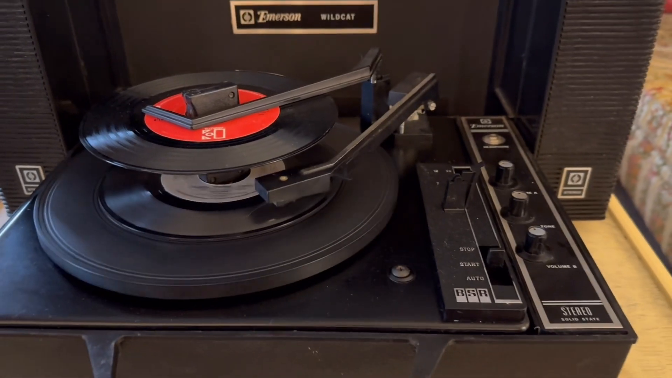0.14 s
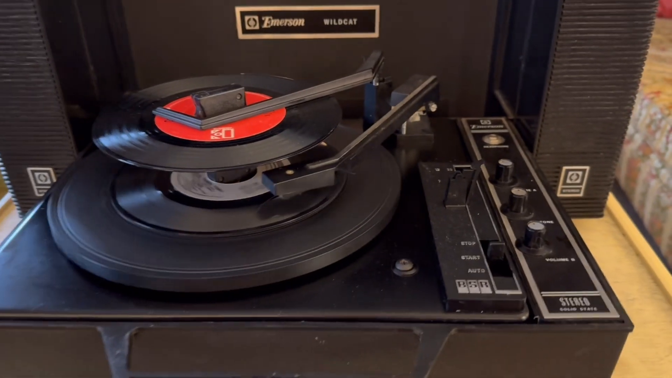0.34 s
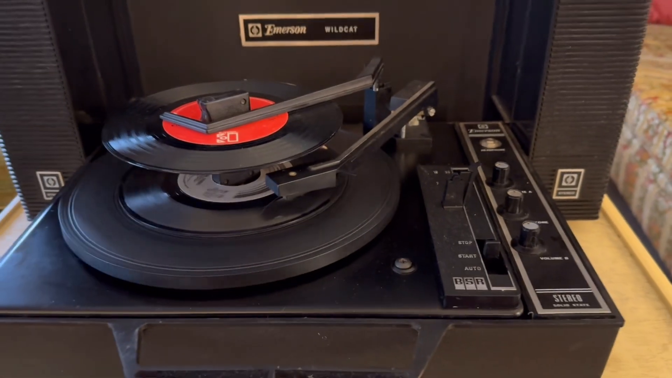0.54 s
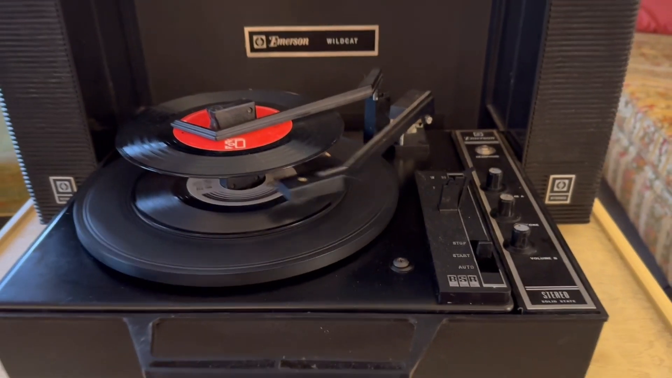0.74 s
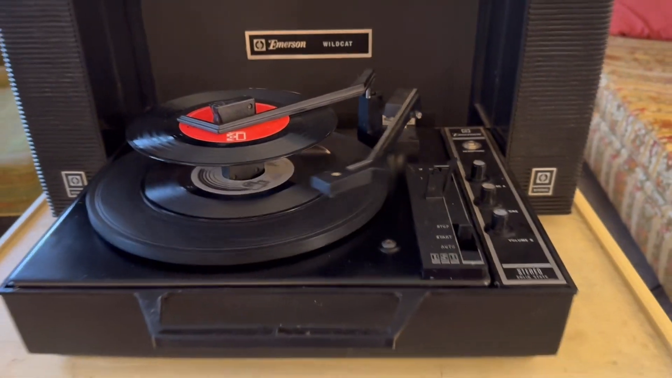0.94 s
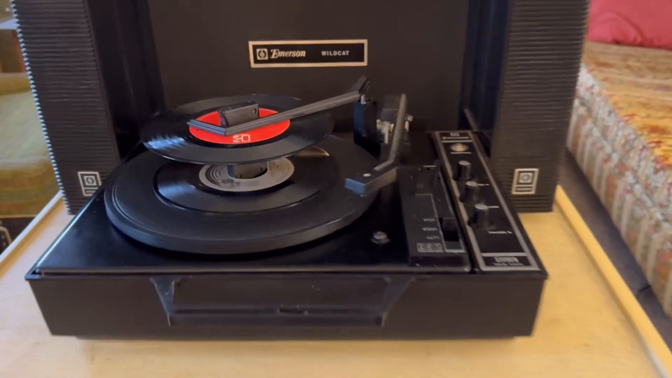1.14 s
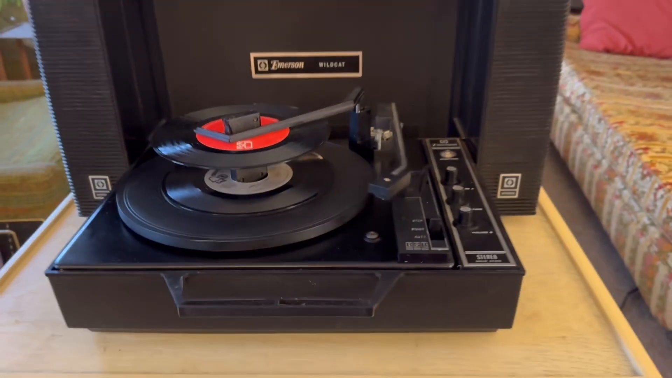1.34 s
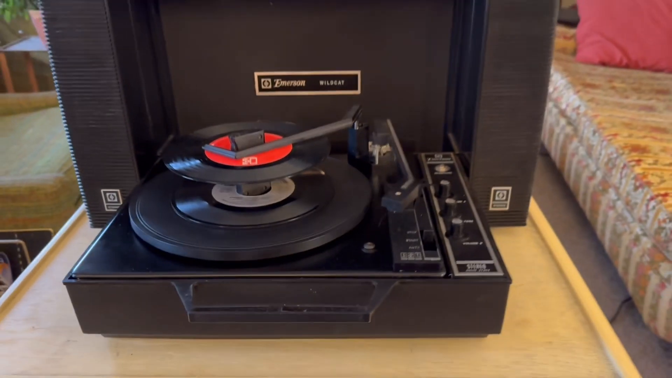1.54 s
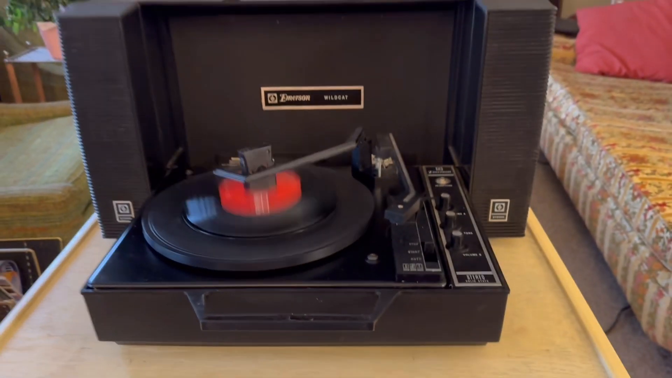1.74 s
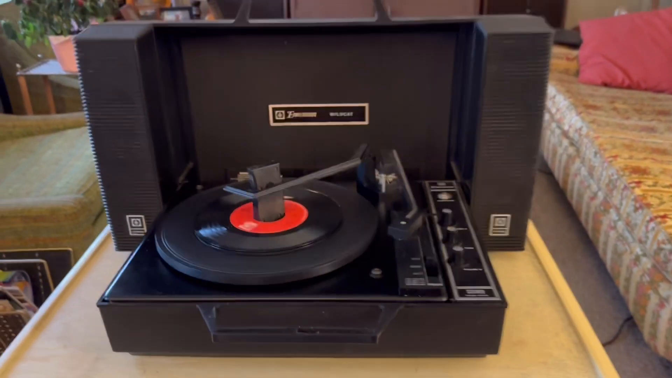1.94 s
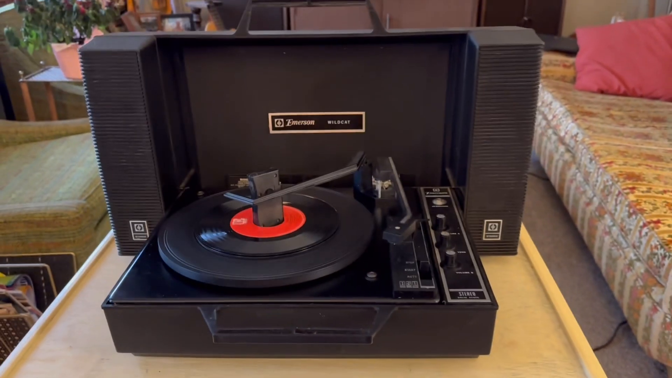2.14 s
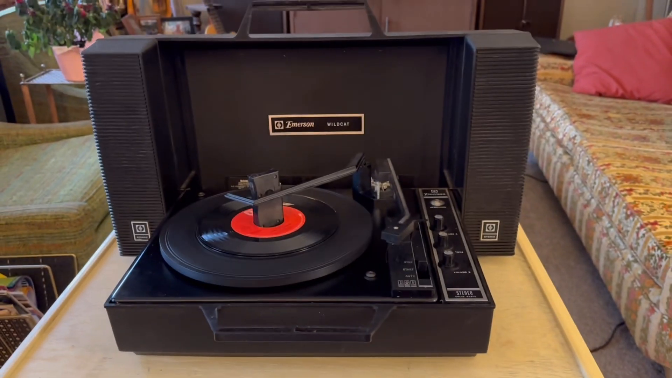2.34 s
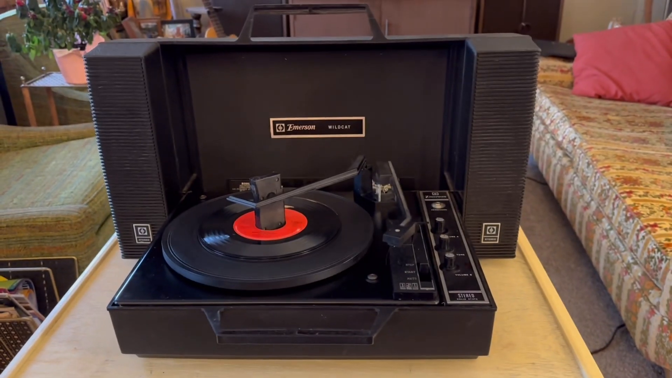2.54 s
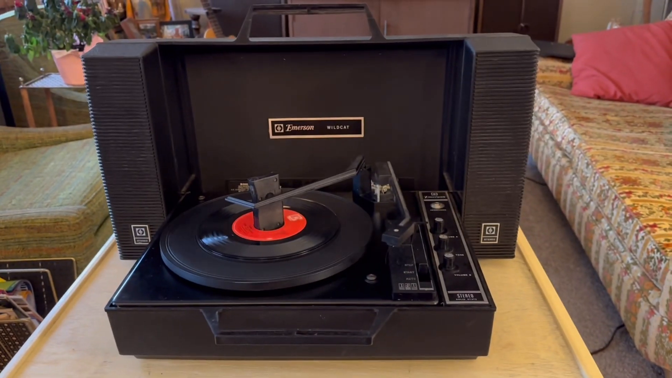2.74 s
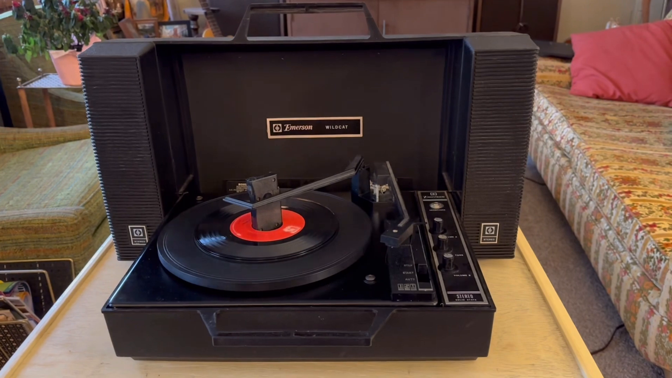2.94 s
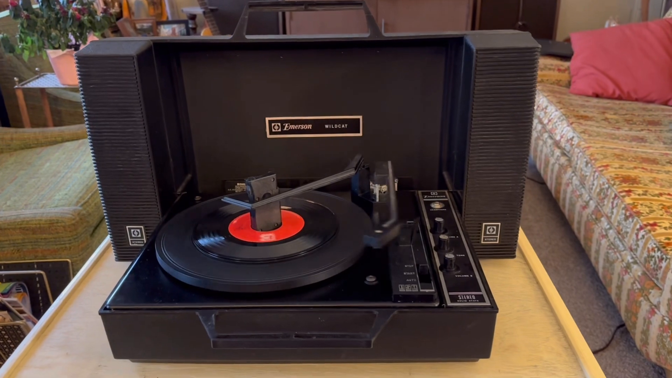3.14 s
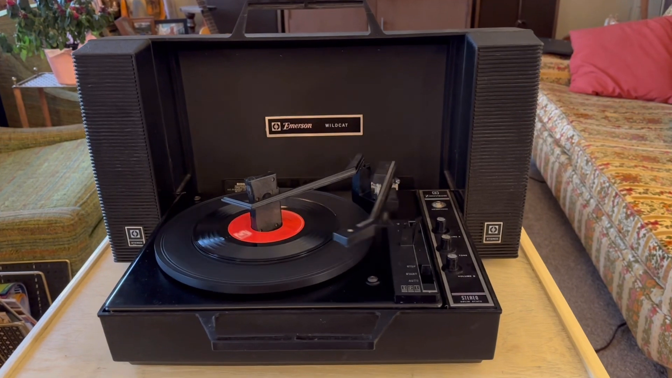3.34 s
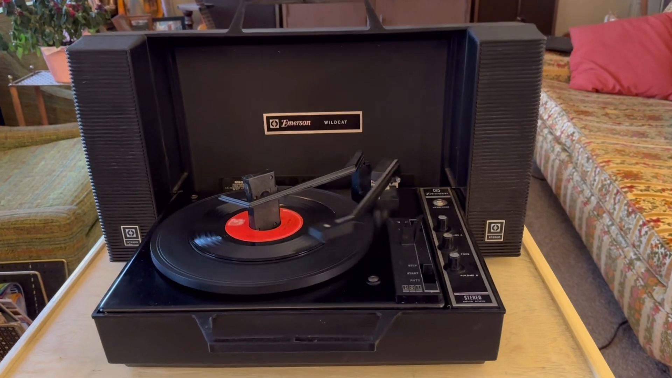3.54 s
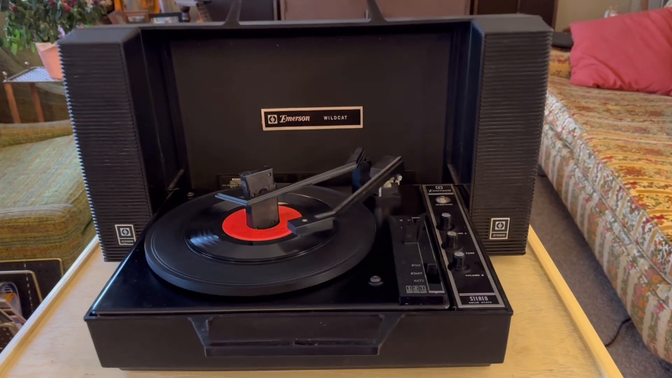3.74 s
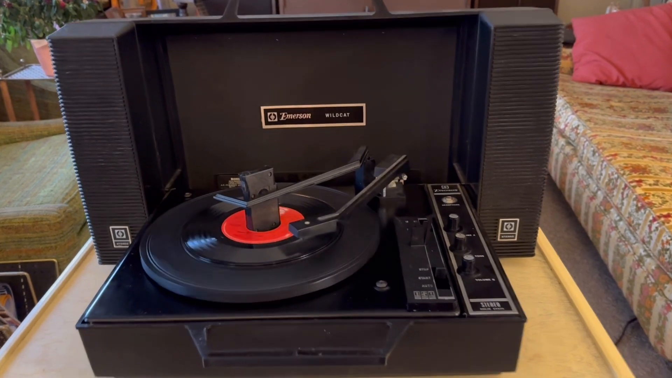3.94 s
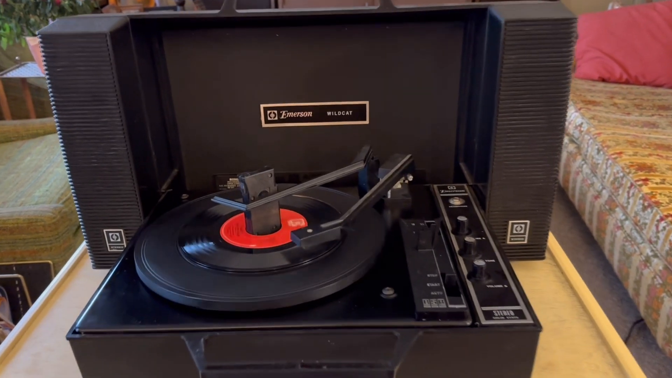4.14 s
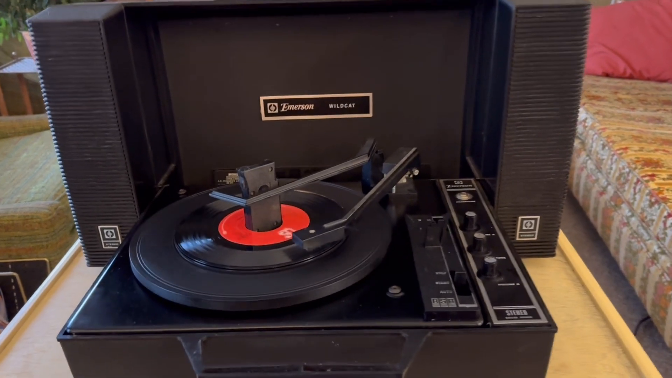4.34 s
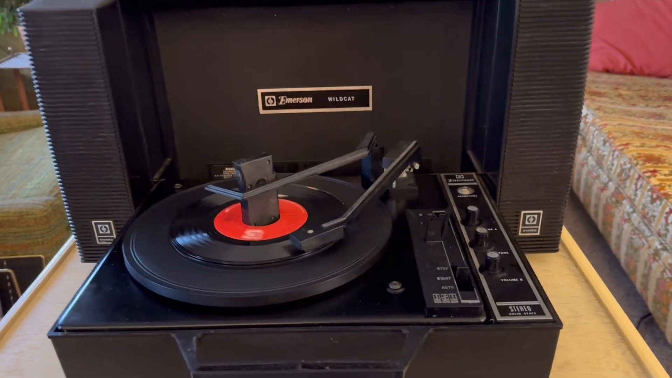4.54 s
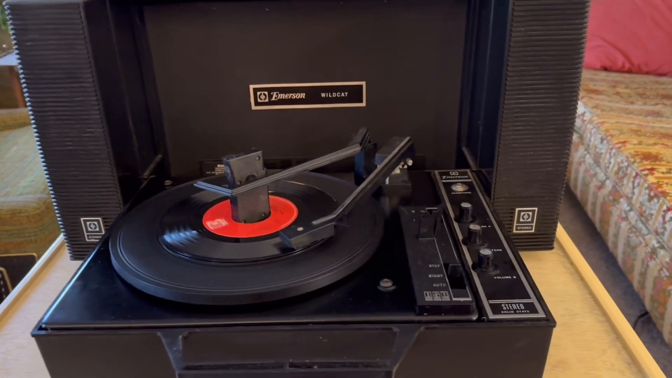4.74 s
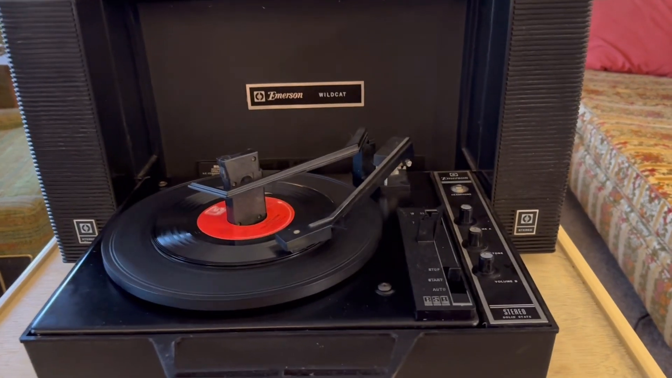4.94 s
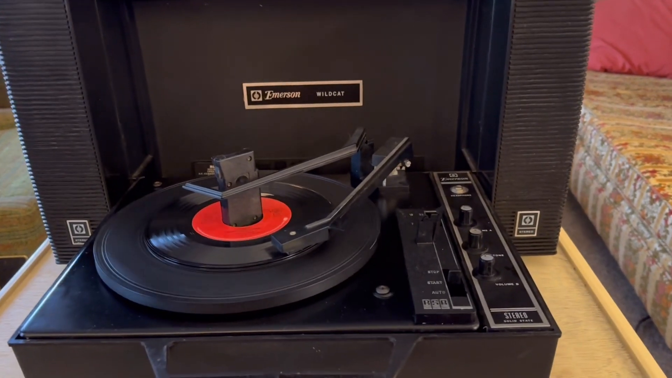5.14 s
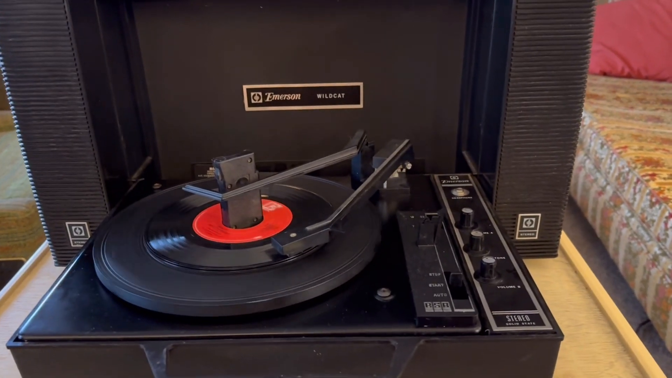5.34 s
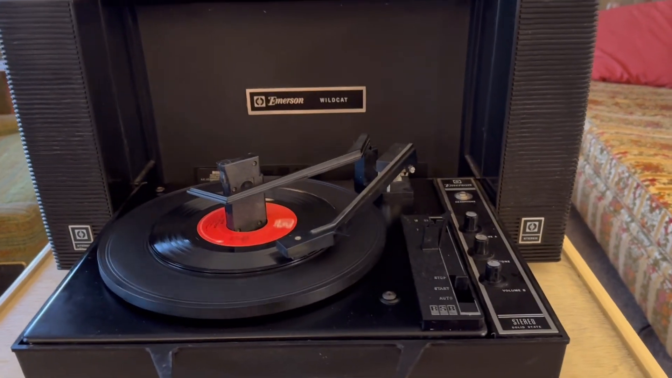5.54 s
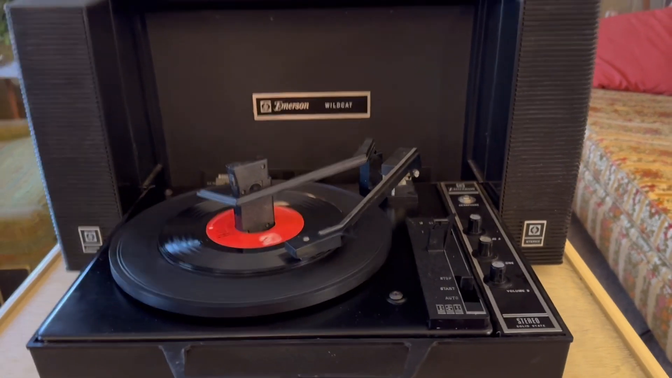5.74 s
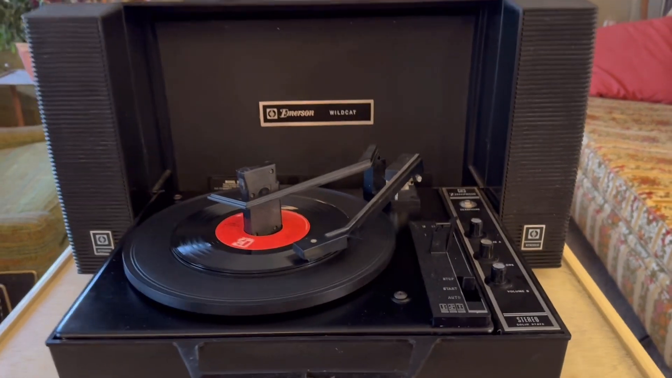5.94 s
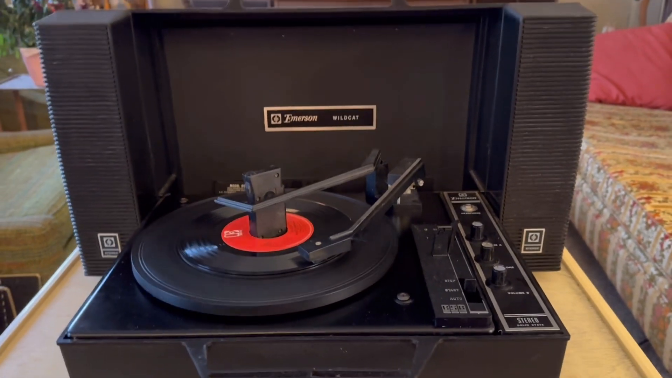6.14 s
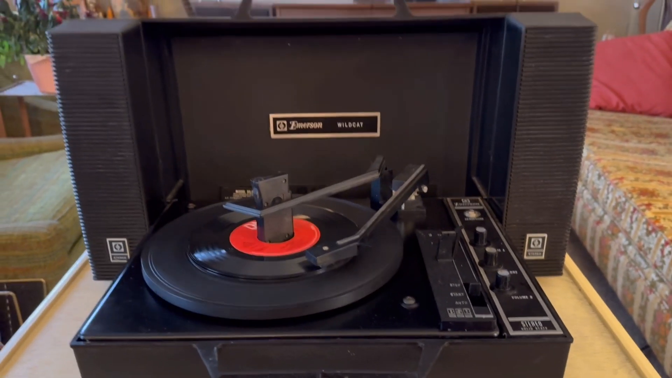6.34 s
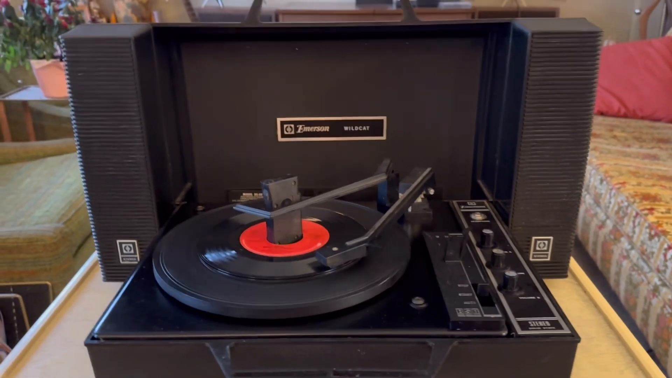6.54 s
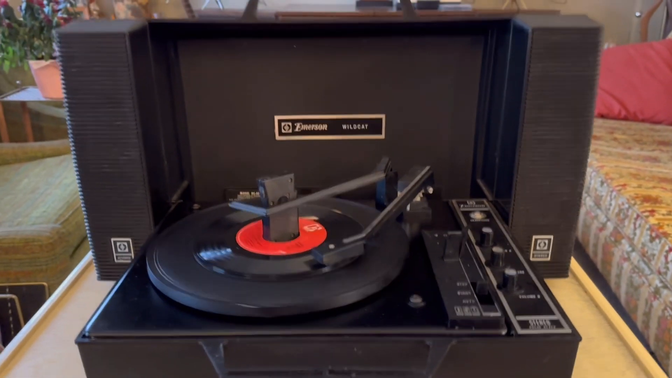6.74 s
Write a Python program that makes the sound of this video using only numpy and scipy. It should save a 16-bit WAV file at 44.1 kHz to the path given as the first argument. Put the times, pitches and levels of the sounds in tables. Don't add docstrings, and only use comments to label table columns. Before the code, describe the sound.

Steady low motor hum in a furnished room, a sharp plastic clack-clatter of a dropping record, small mechanical clicks, a needle thump, then groove hiss.

```python
import sys
import numpy as np
from scipy import signal
from scipy.fft import rfft, irfft
from scipy.io import wavfile
from scipy.ndimage import uniform_filter1d

SR = 44100
rng = np.random.default_rng(int(sys.argv[2]) if len(sys.argv) > 2 else 0)


def wav_out(sig):
    wavfile.write(sys.argv[1], SR, np.round(np.clip(np.atleast_2d(sig).T, -1, 1) * 32767).astype(np.int16))


def volts(x):
    e = np.asarray(x, float) / 20
    return 10 ** e


N = 298994
T = np.arange(N) / SR

# start_s, strength_db, hardness_db, edge_db
CATCHES = [(.804, -53, -17, -2), (1.573, -34.5, -38, 2), (1.632, -43, -34, -6), (2.67, -33.5, -17, -20),
           (3.064, -56, -22, -5), (3.083, -58, -14, -7), (3.284, -67, -4, -2), (3.716, -55, -22, -14),
           (4.081, -43, -12, -10), (4.468, -56, -2, -14), (4.511, -64, 7, -4), (4.555, -48, -15, -14),
           (4.578, -54, -7, -2), (4.951, -46, -19, -12), (5.395, -57, -15, -5)]
# start_s, strength_db, hardness_db, edge_db, left_minus_right_db
LANDINGS = [(1.695, -37, -13, -4, 8), (1.7, -33, -11, 2.5, 3.5), (1.715, -21, -13, .5, 8),
            (1.727, -23, -11, 2, 5.5), (1.747, -23.5, -26, -9, -7), (1.759, -46, 5, .5, -18),
            (1.7641, -31, 9, -6, 7), (1.772, -22, -14, -25, .5), (1.783, -46, 7, -19, 1.5),
            (4.9945, -26.5, -13, 7, 4), (5.0, -30, -9, 0, -2)]
CATCH_RATTLE_S, CATCH_RATTLE_S_PER_DB, CATCH_PAN_DB = .0085, .0003, 5
LANDING_RATTLE_S = .0045


def contacts():
    rows = []
    for s, db, hard, edge in CATCHES:
        rattle_s = CATCH_RATTLE_S + CATCH_RATTLE_S_PER_DB * (db + 50)
        rows.append((s, db, db + hard, db + hard + edge, rattle_s, CATCH_PAN_DB))
    for s, db, hard, edge, pan_db in LANDINGS:
        rows.append((s, db, db + hard, db + hard + edge, LANDING_RATTLE_S, pan_db))
    return sorted(rows)


# pitch_hz, level_db, t60_s
DECK_MODES = [(500, -10, .04), (695, -3, .04), (735, -3, .07), (925, -6, .04), (1060, -8, .03),
              (1140, -8, .04), (1340, -6, .035), (1475, -6, .035), (1640, -6, .035), (1790, -6, .03),
              (1935, -6, .03), (2190, -8, .03), (2480, -8, .025), (2900, -10, .025)]


def knocks():
    out, t = np.zeros((2, N)), T[:SR // 4]
    for s, clunk_db, clack_db, sizzle_db, rattle_s, pan_db in contacts():
        low, mid, high = (rattle(t, max(rattle_s, .0008)) for _ in range(3))
        spot = rng.standard_normal((len(DECK_MODES), 2))
        deck = []
        for (hz, db, t60), (detune, gain) in zip(DECK_MODES, spot):
            deck.append((hz * (1 + 0.039 * detune), db + 0.89 * gain, t60))
        for x, hz, width, db in ((low, 760, 850, clunk_db), (mid, 1800, 2400, clack_db + 7.5)):
            blow = band(steep(x, hz, width), hz, 2 * width)
            rung = ring(blow, deck)
            direct = blow / np.abs(blow).max()
            add(out, s, direct + 0.16 * rung / np.abs(rung).max(), db, pan_db)
        top_share = np.clip((sizzle_db + 62) / 25, .04, .7)
        sizzle = band(steep(high, 5910, 4000), 5200, 5500) + top_share * steep(high, 8300, 8700)
        add(out, s, sizzle, sizzle_db + 12, pan_db)
    return out


# start_s, level_db, pitch_hz, t60_s
THUDS = [(1.573, -33, 310, .035), (1.58, -30, 228, .075), (1.633, -38, 290, .04), (1.64, -34, 232, .08),
         (1.666, -39, 245, .06), (1.688, -34, 290, .05), (1.698, -31, 235, .06), (1.714, -24, 370, .03),
         (1.7175, -14, 247, .08), (1.743, -29, 310, .04), (1.758, -30, 295, .03), (1.77, -29, 215, .04),
         (1.716, -26, 685, .034), (1.72, -26.5, 455, .093), (1.723, -21.5, 325, .046), (1.79, -43, 106, .5),
         (1.779, -29, 285, .03), (1.836, -40, 320, .05), (2.672, -48, 732, .049), (2.676, -37, 355, .13),
         (2.682, -50.5, 495, .12), (2.688, -43, 370, .05), (2.7, -42, 350, .06), (4.081, -41, 735, .07),
         (4.092, -41, 720, .075), (4.113, -52, 740, .06), (4.148, -57, 750, .06), (4.089, -45, 216.5, .16),
         (4.091, -47, 408, .14), (4.555, -48, 443, .062), (4.57, -50, 560, .06), (4.951, -36, 250, .03),
         (4.996, -40.5, 730, .04), (4.997, -40.5, 529, .12), (5.008, -35, 400, .05),
         (5.018, -31, 262, .035), (5.042, -35, 310, .04), (5.065, -43, 300, .06), (5.09, -42, 230, .06),
         (5.115, -42, 290, .08), (5.703, -45, 254, .072)]
# start_s, level_db
BUMPS = [
    (3.721, -50),
    (3.745, -49),
    (3.795, -47),
    (3.822, -52),
    (3.847, -48),
    (3.879, -48),
]
BUMP_HZ, BUMP_RING_S, BUMP_CYCLES = 370, .035, .55
PUSH_CYCLES, PUSH_CYCLES_PER_DB = 1.4, .017
# pitch_hz, level_db, t60_s
CASE_MODES = [(106, -13, .7), (205, -16, 0.13), (250, -22, 0.2), (325, -9, 0.2), (455, -17.5, 0.1)]
# start_s, level_db, pitch_hz, t60_s
PLATTER = (1.73, -55, 773, 1.3)


def thuds():
    out, t = np.zeros((2, N)), T[:SR]
    rows = []
    for s, db, hz, t60 in THUDS:
        rows.append((s, db, hz, t60, PUSH_CYCLES + PUSH_CYCLES_PER_DB * (db + 40)))
    for s, db in BUMPS:
        rows.append((s, db, BUMP_HZ, BUMP_RING_S, BUMP_CYCLES))
    for s, db, hz, t60, cycles in rows:
        force = push(t, hz, cycles / hz)
        add(out, s, ring(force, [(hz, 0, t60)] + list(CASE_MODES)), db, 3.)
    s, db, hz, t60 = PLATTER
    tap = 1. * (t == 0)
    add(out, s, ring(tap, [(hz, 0, t60)]), db, 3.)
    return out


# start_s, level_db, pitch_hz, t60_s, left_minus_right_db
PINGS = [(1.714, -24, 1040, .035, 6), (1.727, -32, 1100, .04, 5), (1.728, -33, 900, .05, 5),
         (1.733, -30, 698, .16, 4), (1.744, -34, 1000, .04, 4), (1.727, -38, 6200, .03, 4),
         (1.7635, -24, 1500, .025, 5), (1.765, -27, 1290, .032, 5), (1.765, -29, 1890, .05, 5),
         (1.764, -32, 970, .04, 5), (1.764, -30, 5370, .025, 6), (1.764, -27, 3200, .025, -4),
         (1.773, -28, 1900, .025, 2), (1.798, -42, 1270, .04, 4), (2.671, -43, 1513, .06, 5),
         (2.672, -45, 1250, .08, 5), (2.673, -48, 1800, .1, 5), (2.676, -50, 2350, .08, 5),
         (2.69, -52, 1500, .1, 5), (4.082, -50, 910, .07, 5), (4.081, -50, 2100, .04, 5),
         (4.086, -47, 1650, .025, 5), (4.084, -51, 1250, .04, 5), (4.1, -55, 1300, .05, 5),
         (4.087, -56, 2780, .06, 5), (4.092, -52, 1010, .1, 5), (4.468, -64, 2300, .06, 2),
         (4.512, -59, 5800, .03, 3), (4.512, -63, 2400, .06, 3), (4.577, -58, 6200, .02, 3),
         (4.641, -65, 2140, .04, 3), (4.618, -67, 4500, .02, 3), (4.996, -36, 1900, .04, 3),
         (4.997, -38, 1150, .05, 3), (4.999, -42, 5400, .04, 3), (4.996, -38, 9000, .02, 1),
         (6.061, -57, 6600, .03, -8), (5.096, -50, 6750, .07, 4), (5.098, -56, 4900, .06, 4)]


def pings():
    out, t = np.zeros((2, N)), T[:SR // 4]
    for s, db, hz, t60, pan_db in PINGS:
        force = push(t, hz, .0015)
        add(out, s, ring(force, [(hz, 0, t60), (1.07 * hz, -9, .6 * t60)]), db, pan_db)
    return out


# start_s, length_s, level_db, centre_hz, left_minus_right_db
SCUFFS = [(.792, .03, -70, 1400, 4), (1.677, .021, -58, 2430, 2.5), (1.683, .019, -61, 8500, -1),
          (1.683, .016, -47, 900, 4), (1.7, .014, -42, 1800, 3), (1.718, .028, -37, 1600, 5),
          (1.726, .013, -44, 6000, 4), (1.742, .018, -41, 1300, 0), (1.756, .02, -41, 4000, -4),
          (1.775, .03, -44, 1500, 2), (2.672, .07, -56, 1400, 5), (4.077, .03, -56, 1500, 5),
          (1.578, .05, -56, 900, 5), (1.63, .04, -59, 900, 5), (1.8, .06, -52, 1000, 4),
          (4.99, .014, -47, 5600, 3), (4.99, .013, -45, 11000, 1), (4.998, .03, -50, 1300, 3),
          (3.054, .04, -70, 1187, 3.5), (3.718, .027, -73, 908, 6), (4.982, .012, -68, 5020, 1),
          (5.091, .028, -50.5, 6200, 6.5), (5.091, .057, -56, 1780, 4), (5.092, .052, -55, 10660, 8.5),
          (5.118, .03, -53, 5800, 3), (5.223, .037, -70.5, 7000, -4), (5.704, .017, -70, 2300, -6),
          (5.709, .025, -67, 6000, 0), (5.713, .025, -71.5, 8800, -10), (5.767, .047, -72, 8400, -3.5),
          (5.899, .051, -71, 3500, -3), (6.013, .046, -73, 8500, -5), (6.425, .037, -66, 10900, 2),
          (4.15, .11, -72, 1150, 4), (6.02, .056, -71, 1400, 5), (6.421, .049, -54, 5740, 9),
          (6.421, .054, -61, 1600, .5)]
SCUFF_WIDTH_HZ, SCUFF_WIDTH_SHARE = 2000, .17


def scuffs():
    out, t = np.zeros((2, N)), T[:SR // 8]
    for s, length, db, hz, pan_db in SCUFFS:
        width = min(SCUFF_WIDTH_HZ + SCUFF_WIDTH_SHARE * hz, .9 * hz)
        grains = rng.standard_normal(len(t)) * volts(2.0 * rng.exponential(size=len(t)))
        shape = np.minimum(t / .007, 1) * np.exp(-t / .12) / (1 + (t / length) ** 8)
        slide = steep(grains * shape, hz, 0.94 * width)
        body = .2 * (hz > 2000) * steep(grains * shape, 1800, 3000)
        add(out, s, slide + body, db + 8.5, pan_db)
    return out


# start_s, level_db, centre_hz, left_minus_right_db
TICKS = [(1.039, -65, 3000, 4), (4.63, -59.5, 11000, 2), (4.6545, -63, 9500, 1), (4.689, -60.5, 11000, 0),
         (4.729, -57, 2200, 0), (4.751, -58, 9500, 0), (4.767, -51.5, 3500, 1), (4.85, -53, 11500, 2),
         (4.851, -58, 5000, 3), (4.752, -58, 5500, 3), (4.92, -61, 10500, 1), (5.548, -61, 6200, 2),
         (5.79, -63, 7500, 0), (6.061, -47.5, 6540, -9), (6.542, -57, 8300, -7), (6.671, -64, 5000, 0)]


def ticks():
    out, t = np.zeros((2, N)), T[:SR // 20]
    for s, db, hz, pan_db in TICKS:
        click = rattle(t, .0012)
        add(out, s, steep(click, hz, 0.39 * hz) + .2 * steep(click, 4000, 7000), db, pan_db)
    return out


CRACKLE_PER_S, CRACKLE_DB, CRACKLE_SHARE = 220, -106, 2.5


def crackle(rub_db):
    caught = rng.random(N) < CRACKLE_PER_S / SR
    size = rng.standard_normal((2, N)) * volts(2.2 * rng.exponential(size=N)) * caught
    smear = rng.standard_normal(SR // 100) * np.exp(-T[:SR // 100] / .002)
    grit = signal.fftconvolve(size[:1] + .5 * size, smear[None], axes=1)[:, :N]
    grit = .5 * band(grit, 9500, 6000) + .8 * band(grit, 5200, 3000) + band(grit, 1800, 2500)
    return level(grit, CRACKLE_DB) * volts(CRACKLE_SHARE * rub_db + 3.0 * walk(9))


MOTOR_HZ = 56.05
# centre_hz, width_hz, level_db
MOTOR_BODY = [(730, 80, -79), (1010, 200, -90), (1500, 500, -94), (380, 100, -80)]
# centre_hz, width_hz, level_db
DRONE = [(258.1, 4, -66.5), (90.43, 14, -65), (229, 30, -69.5), (2860, 98, -89), (4140, 45, -99.5),
         (4840, 130, -91.5), (5060, 240, -94.5), (6740, 100, -98), (7300, 580, -96), (9700, 36, -96.5),
         (10160, 330, -95), (10400, 200, -97)]
# pitch_hz, level_db
HUM = (258.6, -60.5)


def motor(whine_db):
    turns = np.cumsum(MOTOR_HZ * (1 + .002 * walk(6)) / SR)
    pulses = np.diff(np.floor(turns), prepend=0) * volts(1.5 * rng.standard_normal(N))
    out = sum(level(steep(pulses, hz, width), db) for hz, width, db in MOTOR_BODY) * volts(whine_db)
    hum_hz, hum_db = HUM
    hum = np.sin(2 * np.pi * np.cumsum(hum_hz + 2.5 * walk(5)) / SR)
    out = out + level(hum, hum_db) * volts(2.0 * walk(7))
    for hz, width, db in DRONE:
        tone = level(steep(rng.standard_normal(N), hz, width), db)
        out = out + tone * volts(1.5 * walk(3.2) + whine_db * (hz > 500))
    return out * volts(np.array([[1.2], [-1.2]]))


# pitch_hz, level_db (per Hz)
ROOM_NOISE = [(12, -46), (20, -11), (81, 0), (177, -5), (255, -4), (301, -10), (607, -23), (738, -24.5),
              (1150, -29.5), (2820, -42), (3440, -52), (4810, -41), (8410, -49), (14300, -50.5),
              (16000, -64)]
# pitch_hz, likeness (0 to 1)
LIKENESS = [(60, 0.94), (130, 0.86), (290, 0.75), (640, 0.54), (1410, 0.35), (3100, 0.1), (6820, 0.07),
            (15000, 0.15)]
ROOM_DB = -51


def air(*changes_db):
    out, shape, like = 0, np.transpose(ROOM_NOISE), np.transpose(LIKENESS)
    corners = np.log([60, 300, 1500, 7000, 13000])
    for hz in 22 * 2 ** np.arange(0, 9.5, 1 / 3):
        mid, side = (level(steep(n, hz, hz / 3), 0) for n in rng.standard_normal((2, N)))
        same = np.clip(np.interp(np.log(hz), np.log(like[0]), like[1]), 0, .99)
        share = [np.interp(np.log(hz), corners, row) for row in np.eye(5)[1:]]
        db = np.interp(np.log(hz), np.log(shape[0]), shape[1]) + 10 * np.log10(hz)
        swing = sum(a * c for a, c in zip(share, changes_db))
        pair = np.sqrt(1 + same) * mid + np.sqrt(1 - same) * side * np.array([[1], [-1]])
        out = out + volts(db + swing + 0.69 * walk(5.7)) * pair
    quiet = out[:, int(2.9 * SR):int(3.6 * SR)]
    out = out * volts(ROOM_DB - 5.5) / np.sqrt(np.mean(quiet ** 2))
    return out * volts(np.array([[1.2], [-1.2]]))


# centre_hz, t60_s, level_db
ROOM_TAIL = [(500, .4, -11), (1200, .38, -9), (2400, .33, -12), (3400, .55, -16), (5200, .22, -15),
             (11000, .18, -13)]
TAIL_GRAIN_DB = 4


def room(dry):
    t, tail = T[:SR // 2], 0
    for hz, t60, db in ROOM_TAIL:
        mid, side = rng.standard_normal((2, len(t)))
        noise = steep(mid + min(hz / 1500, 1) * side * np.array([[1], [-1]]), hz, 1.3 * hz)
        noise = noise * np.exp(-np.log(1000) * t / t60) * np.clip(t / .01, 0, 1)
        noise = noise * volts(TAIL_GRAIN_DB * walk(250)[:len(t)])
        energy = np.sum(noise ** 2, axis=1, keepdims=True)
        tail = tail + volts(db) * noise / np.sqrt(energy * SR / (2 * hz))
    spectrum = rfft(tail)
    power = np.abs(spectrum) ** 2 + 1e-12
    even = np.sqrt(uniform_filter1d(power, size=400) / uniform_filter1d(power, size=25))
    tail = irfft(spectrum * even, len(t)) * np.clip((.48 - t) / .15, 0, 1)
    return dry + signal.fftconvolve(dry, tail, axes=1)[:, :N]


PORT_DELAY_S = -0.000077


def ports(x):
    turn = -2 * np.pi * PORT_DELAY_S * np.arange(N // 2 + 1) * SR / N
    return np.array([irfft(rfft(x[0]) * np.exp(1j * turn), N), x[1]])


def push(t, hz, half_s):
    return np.sin(2 * np.pi * hz * t) * (t < 2 * half_s) * np.sin(np.pi * t / (2 * half_s))


RATTLE_RISE_SHARE = .25


def rattle(t, tau):
    spread = rfft(rng.standard_normal(len(t)) * np.exp(-t / tau))
    flat = irfft(spread / (np.abs(spread) + 1e-9), len(t))
    return flat * np.minimum(t / (RATTLE_RISE_SHARE * tau), 1) * np.exp(-t / (4 * tau))


def ring(x, modes):
    out = 0
    for k, (hz, db, t60) in enumerate(modes):
        r, w = np.exp(-np.log(1000) / (t60 * SR)), 2 * np.pi * hz / SR
        mode = signal.lfilter([np.sin(w)], [1, -2 * r * np.cos(w), r * r], x)
        out = out + (-1) ** k * volts(db) * mode
    return out


def band(x, hz, width):
    return signal.lfilter(*signal.iirpeak(min(hz, .44 * SR), max(hz / width, .3), fs=SR), x)


def steep(x, hz, width):
    return band(band(x, hz, width), hz, width)


def walk(rate):
    k = int(SR / rate)
    held = np.repeat(rng.standard_normal(N // k + 1), k)
    return uniform_filter1d(uniform_filter1d(held, k), k)[:N]


def level(x, db):
    return x * volts(db) / np.sqrt(np.mean(x ** 2))


def add(out, s, x, db, pan_db):
    i = int(s * SR)
    x = x[:N - i] * volts(db) / np.abs(x).max()
    out[:, i:i + len(x)] += x * volts(np.array([[pan_db], [-pan_db]]) / 2)


# start_s, level_db
CLOSENESS = [
    (0, 4.5),
    (.72, 4.6),
    (1.0, 2.5),
    (2.3, 2.6),
    (3.4, .6),
    (4.5, 3),
    (5.3, 0),
    (5.9, -.5),
    (6.78, -2),
]
# start_s, level_db
RUBBING = [(0, 0), (3.65, -1), (3.8, 1.5), (4.4, 2), (4.6, 11), (4.75, 14), (4.95, 9), (5.3, 5), (5.6, 7),
           (6.3, 8), (6.78, 5)]
RUB_SHARES = [.45, .85, .75, .16]
NEAR_SHARES = [-.3, .45, .7, 1.5]


def scene():
    near_db, rub_db = (np.interp(T, *np.transpose(c)) for c in (CLOSENESS, RUBBING))
    blows = thuds()
    near = room(ports(knocks() + pings()) + ticks() + scuffs() + 0.46 * blows) + 0.69 * blows
    swings_db = [a * rub_db + b * near_db for a, b in zip(RUB_SHARES, NEAR_SHARES)]
    return near + motor(near_db) + air(*swings_db) + crackle(rub_db)


def band_limit(x):
    return signal.sosfilt(signal.butter(12, 16370, fs=SR, output="sos"), x)


def record(dry):
    trimmed = signal.sosfilt(signal.butter(3, 42, "high", fs=SR, output="sos"), dry)
    mix = signal.sosfilt(signal.ellip(8, .2, 60, 15600, fs=SR, output="sos"), trimmed)
    return band_limit(mix)


dry = scene()
out = record(dry)
wav_out(out)
```